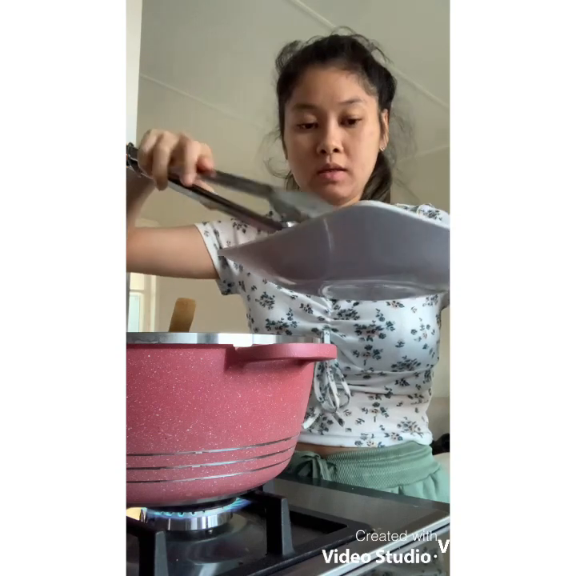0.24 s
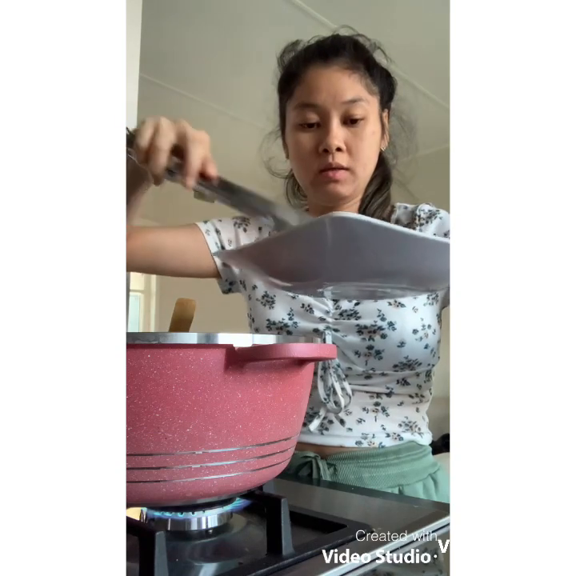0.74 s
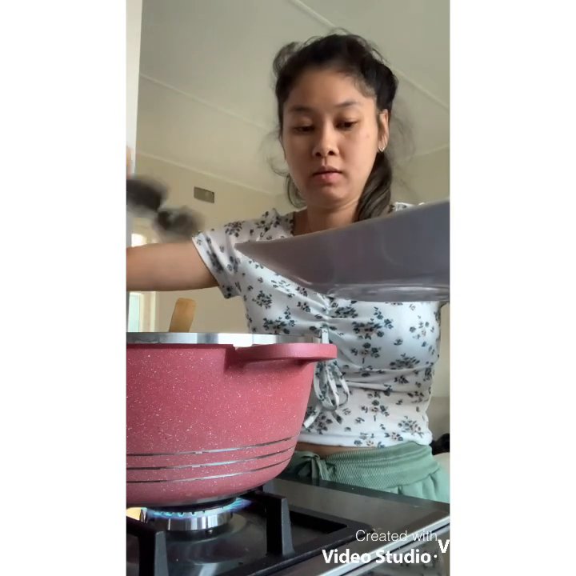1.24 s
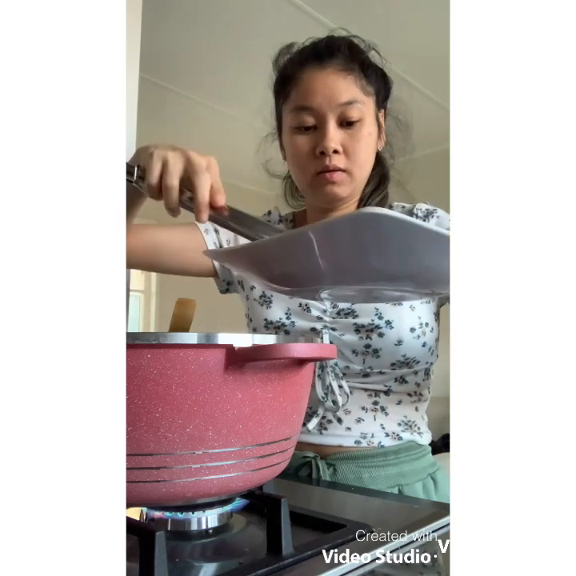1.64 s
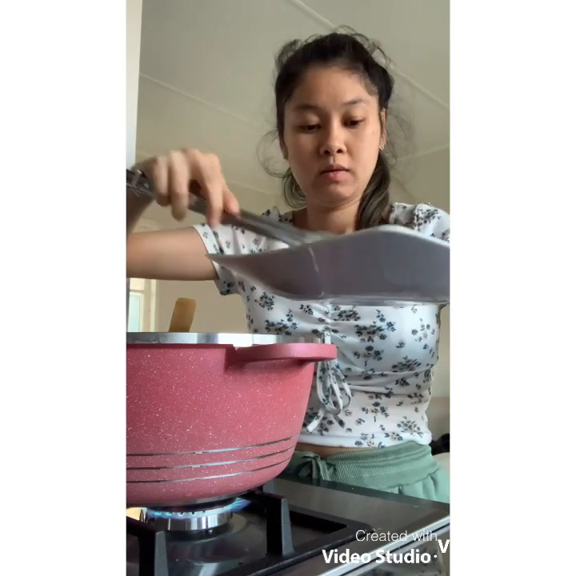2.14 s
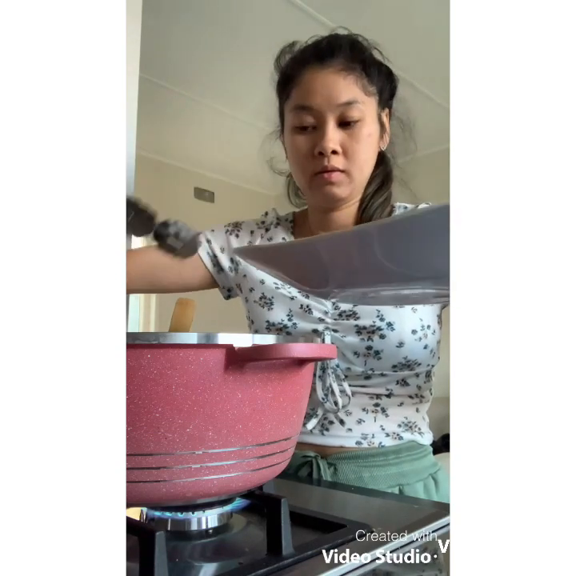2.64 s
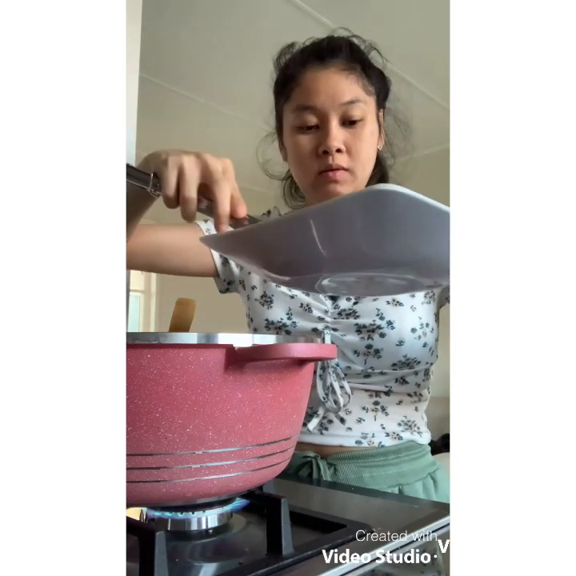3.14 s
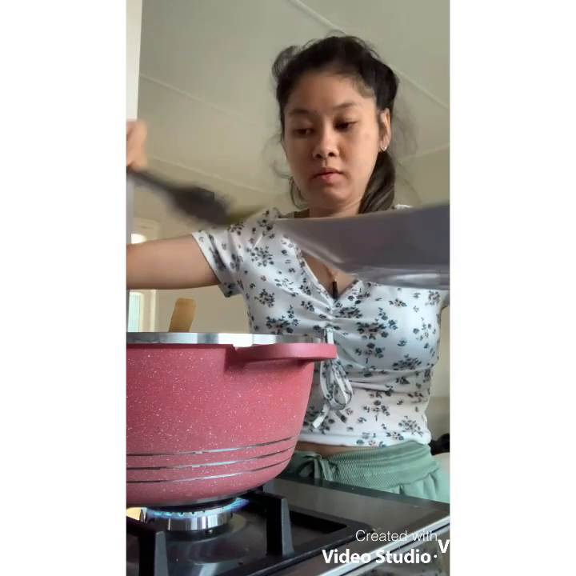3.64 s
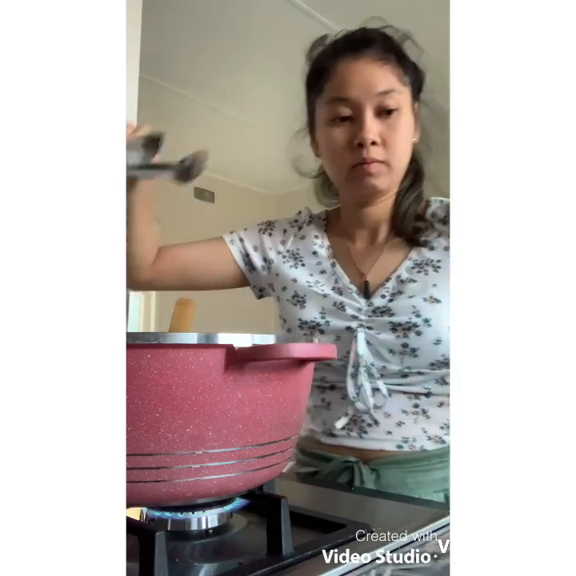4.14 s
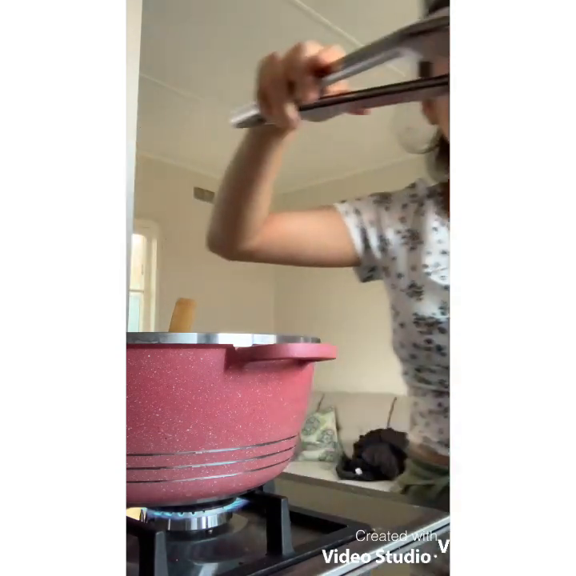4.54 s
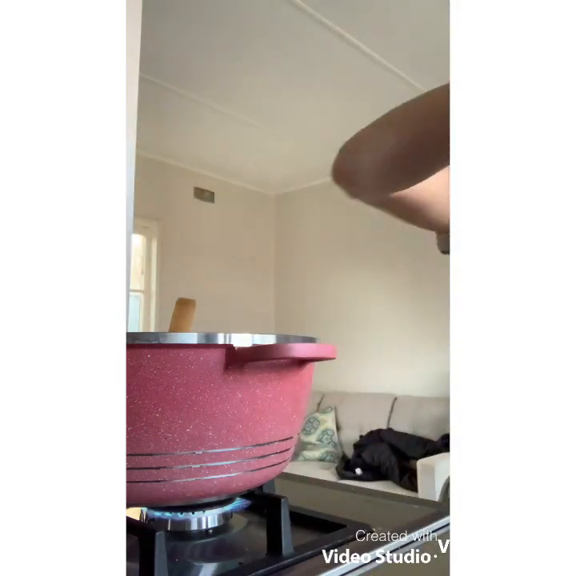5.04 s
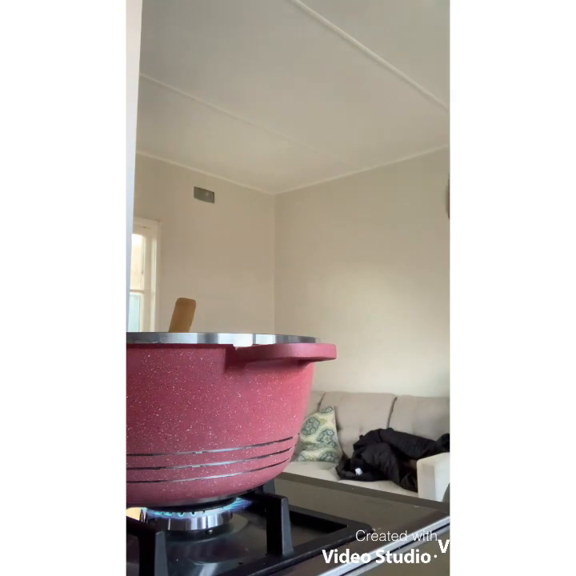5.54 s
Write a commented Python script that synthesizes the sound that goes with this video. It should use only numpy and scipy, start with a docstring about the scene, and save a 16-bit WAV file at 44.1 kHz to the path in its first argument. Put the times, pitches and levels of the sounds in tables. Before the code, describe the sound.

In a small home kitchen, a gas burner rushes softly throughout. Close to a stereo microphone, steel tongs click and their tips tap a plastic tray in loose, irregular bursts with short pauses. Near the end the tongs snap together loudly, rattle several times, and things drag and knock down on the counter.

```python
"""Steel tongs click close to the microphones over the soft, steady rush of a gas burner in a home kitchen.
They pick food off a hand-held plastic tray: the tips tap it, the arms click and slide over each other.
Then the tongs rattle, the arms rub, and things are dragged and put down on the counter with a clatter.
Each blow is a crack of noise shaped by the struck body plus a ring of its modes; slides are grainy hiss.
The flame is fluttering noise; blows and slides also get a short kitchen tail and one distinct reflection."""
import sys
import numpy as np
from scipy import signal
from scipy.fft import rfft, irfft, next_fast_len
from scipy.io import wavfile

SR = 44100
rng = np.random.default_rng(int(sys.argv[2]) if len(sys.argv) > 2 else 0)


def bounce(signal):
    """Save signal as a 16-bit WAV file at the path given by the first command-line argument."""
    frames = np.transpose(np.atleast_2d(signal))
    limited = np.clip(frames, -1, 1)
    pcm = np.round(limited * 32767).astype(np.int16)
    wavfile.write(sys.argv[1], SR, pcm)


N = 255901

# The steel arms click together. Each row: start in seconds, level in dB, t60 of the crack in seconds
# (short when food or the hand damps them), tilt in dB per octave, lift of the low modes in dB.
TONG_CLICKS = [(0.0004, -25, 0.11, 6, 4), (0.17, -25.5, 0.13, 1.5, 8), (0.373, -18, 0.057, 6.5, 10.5),
               (0.9975, -28, 0.04, 2, 1), (1.1607, -24, 0.11, -0.5, -5), (1.2522, -21.5, 0.088, 9.5, 9),
               (1.4002, -39, 0.22, 9, 13), (1.4335, -26, 0.083, -1, -4), (2.253, -26, 0.054, 0.5, 3),
               (2.3624, -30, 0.031, -12.5, -14), (2.835, -13, 0.068, -2, -10),
               (3.0925, -30.5, 0.093, -10.5, -7), (3.5368, -23, 0.044, 1, 3), (3.655, -40.5, 0.039, -2, 0),
               (4.585, -29, 0.032, -2, -17), (4.7131, -2.5, 0.024, 10, 11.5), (4.7456, -9, 0.033, -2.5, 0),
               (4.753, -10.5, 0.025, -6, -11), (4.789, -25.5, 0.039, -1, -5),
               (4.8172, -15, 0.062, 4.5, 3.5), (4.9528, -7.5, 0.075, 3.5, -6), (4.965, -9, 0.087, 0.5, -2),
               (5.0398, -26, 0.04, 13, 0), (5.0694, -23.5, 0.16, -7.5, 2), (5.0947, -4.5, 0.075, 0, -3.5),
               (5.3024, -21.5, 0.055, 10, 25), (5.6831, -4.5, 0.059, -6.5, -7)]
# What the steel rings with. Each row: nominal pitch in Hz, strength in dB, undamped t60 in seconds.
TONG_MODES = [(1600, -11, .18), (2130, -13, .15), (2560, -10, .18), (3100, -6, .14), (3310, -8, .14),
              (3540, -4, .15), (3750, -8, .12), (4355, -3, .15), (4513, -7, .14), (4855, -7, .15),
              (5450, -10, .13), (5990, -4, .15), (6446, -4, .14), (6538, -1, .2), (6995, -2, .2),
              (7500, -1, .18), (7700, -6, .12), (8217, -5, .15), (8480, -3, .17), (9070, -4, .13),
              (9205, -5, .14), (10150, -6, .11), (10416, -4, .12), (10720, -5, .12), (13210, -9, .08)]
# The crowd of short-lived modes in the steel's crack. Each row: frequency in Hz, density in dB per Hz.
TONG_CRACK = [(100, -70), (600, -17), (2100, -15.5), (3000, 3), (4500, 4), (7000, 3), (11000, 2),
              (12800, -12.5), (15000, -3), (16500, -34)]
# What the counter rings with. Each row: nominal pitch in Hz, strength in dB, undamped t60 in seconds.
COUNTER_MODES = [(116, -6, .2), (262, -5, .12), (402, -9, .18), (660, -7, .16), (704, -4, .17),
                 (820, -5, .2), (1000, -5, .16), (1038, -3.5, .16), (1145, -4, .2), (1215, -7, .14),
                 (1418, -1, .18), (1545, -5, .15), (1674, -7, .17), (1870, -11, .16), (1980, -8, .15),
                 (2090, -10, .14), (2322, -12, .14), (2520, -9, .16), (2945, -10, .13), (3015, -6, .14),
                 (3450, -5, .14), (3700, -6, .14), (4026, -5, .12)]
# The short-lived modes in the counter's crack. Each row: frequency in Hz, density in dB per Hz.
COUNTER_CRACK = [(25, -48), (60, -13), (110, -7.5), (180, -32), (270, -6.5), (450, -5), (1000, -10.5),
                 (2000, -5), (3000, 2), (5000, 2.5), (9000, -5), (12000, -19), (16000, -28)]
# The part of a sound in which the two microphones differ. Each row: frequency in Hz, share in dB.
APART = [(80, -26.5), (250, -11), (600, -7.5), (1200, -3), (2500, 2.5), (5000, -24), (12000, -25)]

DAMPING_DB = 28   # ring lost for a tenfold shorter crack
MICROPHONE_SIGNS = np.array([[1], [-1]])   # what differs has opposite sign at left and right


def tray_taps():
    """The tongs' two tips strike the plastic one after the other; damped taps ring less."""
    # Each row: start in seconds, level in dB, tilt in dB per octave, t60 of the crack in seconds,
    # then how strongly the struck spot feeds each of the eight main modes, in dB.
    taps = [(0.1724, -15.5, 0.5, 0.1, 1, 12.5, 1, 8, 3, -13, -3, -9),
            (0.3309, -8.5, 0.5, 0.071, -9, -3, 8, 0.5, 6.5, 1.5, -3, -5),
            (0.3786, -10.5, 0, 0.062, -1, -5, 6, -2, 1, -2.5, -6, -2.5),
            (1.7184, -13, 2.5, 0.05, 10, 12.5, -7, 8.5, -5, 7, -2.5, -4.5),
            (2.835, -10, -4, 0.071, 13, -3.5, -24, 7, 1, 8.5, 9, 9.5),
            (2.9415, -8.5, 1, .062, 9, 4, 7, 14, -6, 0.5, -6, -12),
            (3.119, -18.5, -3.5, .05, 4, 5, -7, 7.5, -12, 4, -3, -6)]
    # The tray's main modes, in Hz.
    main_hz = [630, 840, 970, 1460, 1730, 2280, 2950, 4200]
    # What the tray rings with. Each row: nominal pitch in Hz, strength in dB, undamped t60 in seconds.
    tray_modes = [(385, -8, .14), (613, -14, .1), (700, -10, .11), (843, 0, .12), (952, -1, .13),
                  (1012, -5, .14), (1205, -6, .11), (1420, -2, .12), (1480, -7, .12), (1545, -6, .11),
                  (1684, -8, .1), (1780, -9, .1), (2238, -5, .085), (2325, -6, .085), (2400, -8, .11),
                  (2935, -7, .15), (3045, -9, .1), (3460, -8, .12), (3750, -10, .1), (4060, -8, .09),
                  (4280, -5, .09), (6450, -16, .08), (8300, -16, .08)]
    # The short-lived modes in the tray's crack. Each row: frequency in Hz, density in dB per Hz.
    tray_crack = [(100, -12.5), (300, -7.5), (700, -3.5), (1500, -6), (2500, 1), (4300, 11.5), (6500, -0.5),
                  (10000, -9), (13000, -20), (16000, -39)]
    crack_offset_db, ring_offset_db = -7, -12   # against the tap's level
    free_t60_s = .075   # crack of a tap that no food or hand damps
    tips = ((0, 0), (0.0045, -11))   # delay in seconds, level in dB
    table = []
    for s, db, tilt_db, t60, *fed_db in taps:
        damped_db = DAMPING_DB * np.log10(t60 / free_t60_s)
        for late_s, tip_db in tips:
            crack_db = db + tip_db + crack_offset_db
            ring_db = db + tip_db + ring_offset_db + damped_db
            table.append((s + late_s, crack_db, ring_db, tilt_db, list(zip(main_hz, fed_db)), t60))
    return blows(table, tray_modes, tray_crack, contact_s=0.00068, favour_octaves=0.16, scatter_db=2,
                 hold=.62, sing_db=19, detune=.005, width_hz=50)


def tong_clicks():
    """The steel arms strike each other and ring in their own modes; damped clicks ring less."""
    crack_offset_db, ring_offset_db = -4.5, -9   # against the click's level
    free_t60_s = 0.084   # crack of undamped arms
    body_hz = 2550   # centre of the arms' low modes
    table = []
    for s, db, t60, tilt_db, body_db in TONG_CLICKS:
        damped_db = DAMPING_DB * np.log10(t60 / free_t60_s)
        ring_db = db + ring_offset_db + damped_db
        table.append((s, db + crack_offset_db, ring_db, tilt_db, [(body_hz, body_db)], t60))
    return blows(table, TONG_MODES, TONG_CRACK, contact_s=0.0014, favour_octaves=0.51, scatter_db=3.5,
                 hold=0.5, sing_db=9, detune=.002, width_hz=35)


def counter_knocks():
    """Things put down excite the modes of the struck spot and, to varying degrees, the hollow counter top."""
    # Each row: start in seconds, level in dB, tilt in dB per octave, pitch that the struck spot favours
    # in Hz, lift of the thump in dB, t60 of the crack in seconds.
    knocks = [(5.071, -35.5, -9, 280, 2, .08), (5.091, -32.5, -20, 112, 0, 0.1),
              (5.159, -55, -20, 270, 0, .07), (5.3213, -18.5, 9, 1920, 15, 0.059),
              (5.329, -24.5, -2.5, 826, 9, 0.041), (5.338, -25, 3.5, 1750, 16, 0.11),
              (5.548, -37, -0.5, 2110, 5, .08), (5.634, -18, -3, 1150, -3, .05),
              (5.641, -12.5, -4, 1040, 2.5, 0.065), (5.648, -13.5, 3.5, 724, 10, 0.043),
              (5.665, -15, -1.5, 1350, -0.5, 0.073), (5.696, -25, 1, 1880, -2, 0.13),
              (5.7032, -14.5, -2, 880, -20, 0.055), (5.729, -31, -4, 116, -6, 0.075),
              (5.742, -22.5, -9, 1040, -10, 0.08)]
    # The counter top's hollow notes, in Hz.
    thump_hz = [116, 265]
    spot_lift_db, ring_offset_db = 10, -1.5   # lift of the favoured modes; ring against the knock's level
    table = []
    for s, db, tilt_db, spot_hz, thump_db, t60 in knocks:
        favoured = [(spot_hz, spot_lift_db)] + [(hz, thump_db) for hz in thump_hz]
        table.append((s, db, db + ring_offset_db, tilt_db, favoured, t60))
    return blows(table, COUNTER_MODES, COUNTER_CRACK, contact_s=0.0011, favour_octaves=0.2, scatter_db=3,
                 hold=.8, sing_db=28, detune=.008, width_hz=32)


def blows(table, modes, crack_spectrum, contact_s, favour_octaves, scatter_db, hold, sing_db, detune, width_hz):
    """A blow is a crack of crowded, quickly dying modes and a ring of the few strong ones."""
    # Each row of table: start in seconds, crack and ring in dB, tilt in dB per octave,
    # favoured pairs of Hz and dB, t60 of the crack in seconds.
    snap, snap_s = 0.52, 0.00071   # the first instant stands out: extra amplitude, decay time
    chatter_db, chatter_hz = 2.2, 160   # the surfaces chatter as they part
    mode_apart = 0.46   # share of the difference between the microphones that a single mode shows
    out, t = np.zeros((2, N)), np.arange(SR // 4) / SR
    rest_hz, mode_db, mode_t60 = np.transpose(modes)
    decays = from_db(-60 * t / (hold * mode_t60[:, None]))   # damping leaves the share hold of each t60
    grid_hz = np.geomspace(20, SR / 2, 3000)
    contact = 1 - np.exp(-t / contact_s)   # the force takes a moment to build
    apart = mode_apart * from_db(at_hz(APART, rest_hz)) * MICROPHONE_SIGNS
    for s, crack_db, ring_db, tilt_db, favoured, t60 in table:
        def colour(hz):
            """Each blow has its own brightness, and its spot feeds some modes more than others."""
            lift_db = tilted(hz, tilt_db)
            for spot_hz, db in favoured:
                lift_db = lift_db + db * np.exp(-(np.log2(hz / spot_hz) / favour_octaves) ** 2)
            return lift_db

        # grip and load shift each mode from blow to blow
        mode_hz = rest_hz * (1 + detune * rng.standard_normal(len(modes)))
        rings = np.sin(2 * np.pi * mode_hz[:, None] * t) * decays
        # the crack crowds round the strong modes
        body_db = at_hz(crack_spectrum, grid_hz) + colour(grid_hz) + clusters(grid_hz)
        body_db += resonances(np.c_[mode_hz, mode_db, mode_t60], grid_hz, width_hz, sing_db)
        crack = widen(lambda hz: np.interp(hz, grid_hz, body_db), size=len(t)) * from_db(-60 * t / t60)
        crack *= (1 + snap * np.exp(-t / snap_s)) * from_db(chatter_db * slow_noise(chatter_hz, len(t)))
        # each mode varies in strength and radiates a little differently to each microphone
        strengths = from_db(mode_db + colour(mode_hz) + scatter_db * rng.standard_normal(len(modes)))
        strengths = strengths * (1 + apart * rng.standard_normal(len(modes)))
        strengths = rms_one(strengths) * rng.choice([-1, 1], len(modes)) * np.sqrt(2 / len(modes))
        add(out, s, contact * (from_db(crack_db) * crack + from_db(ring_db) * (strengths @ rings)))
    return out


def tong_slides():
    """The arms slide over each other around every click, and rub while the tongs are carried off."""
    # The longer rubs. Each row: start in seconds, end in seconds, level in dB.
    rubs = [(4.589, 4.746, -47), (4.89, 5.005, -33), (5.031, 5.127, -33.5), (5.102, 5.3, -66),
            (5.304, 5.346, -23)]
    before_s, after_s = 0.073, 0.077   # reach of a slide around its click
    table = [(s - before_s, s + after_s, -56.5, -6) for s, *_ in TONG_CLICKS]   # dB, dB per octave
    table += [(start, end, db, -3) for start, end, db in rubs]
    return scrapes(table, TONG_CRACK, TONG_MODES, grain_db=3, grain_hz=90, catch_height=1.3)


def counter_drags():
    """Things dragged over the counter hiss unevenly and make it sing in its modes."""
    # Each row: start in seconds, end in seconds, level in dB, tilt in dB per octave.
    drags = [(5.13, 5.31, -50.5, 4), (5.41, 5.57, -48, -2.5), (5.535, 5.635, -28.5, -2.5),
             (5.615, 5.69, -21.5, 0)]
    return scrapes(drags, COUNTER_CRACK, COUNTER_MODES, grain_db=3.0, grain_hz=121.5, catch_height=0)


def scrapes(table, spectrum, modes, grain_db, grain_hz, catch_height):
    """A sliding thing catches and slips, so its hiss comes in uneven grains and sings in its modes."""
    out = np.zeros((2, N))
    for start, end, level_db, tilt_db in table:
        size = max(round((end - start) * SR), SR // 100)

        def colour(hz):
            """The surface's spectrum, lifted at its modes."""
            singing = resonances(modes, hz, width_hz=30, height_db=14)
            return at_hz(spectrum, hz) + tilted(hz, tilt_db) + singing + clusters(hz)

        hiss = widen(colour, size=size)
        slips = from_db(grain_db * slow_noise(grain_hz, size))
        slips *= 1 + catch_height * catches(size=size)
        add(out, start, from_db(level_db) * rms_one(hiss * slips) * signal.windows.tukey(size, .5))
    return out


def catches(size):
    """Envelope of tiny contacts that come at random and die at once."""
    catches_per_s, catch_s = 170, .0012   # mean rate, decay time
    struck = rng.random(SR) < catches_per_s / SR
    heights = struck * np.minimum(rng.exponential(1, SR), 3)
    # the tiny offset keeps the filter clear of denormal numbers
    return signal.lfilter([1], [1, -np.exp(-1 / (catch_s * SR))], heights[:size] + 1e-18)


def burner(flutter_db, flutter_hz):
    """The gas flame's steady rush flutters a little in level."""
    # Each row: frequency in Hz, density in dB per Hz.
    flame = [(20, -52), (40, -9), (65, 1), (110, 0), (190, -12), (300, -6), (500, -5.5), (1100, -0.5),
             (1500, -8), (2000, -9), (2400, -19.5), (3600, -16), (5200, -21.5), (6400, -24.5),
             (7300, -23.5), (8200, -26.5), (12000, -42), (16000, -33.5)]
    level_db = -47 + flutter_db * slow_noise(flutter_hz, N)
    return from_db(level_db) * widen(lambda hz: at_hz(flame, hz), size=N)


def kitchen(x, build_s):
    """Dense reflections build up off the near walls and die band by band, the treble first."""
    # Each row: frequency in Hz, t60 in seconds.
    tail_t60 = [(150, 0.5), (800, 0.3), (3000, 0.29), (8000, 0.26), (15000, 0.25)]
    t = np.arange(SR // 2) / SR
    edges = np.geomspace(40, 18000, 10)
    tail = np.zeros((2, len(t)))
    for low, high in zip(edges, edges[1:]):
        band_filter = signal.butter(2, [low, high], "band", fs=SR, output="sos")
        band = signal.sosfilt(band_filter, widen(np.zeros_like, size=len(t)))
        tail += band * from_db(-60 * t / at_hz(tail_t60, np.sqrt(low * high)))
    tail *= 1 - np.exp(-(t / build_s) ** 2)
    tail /= np.sqrt(np.sum(tail ** 2) / 2)
    return signal.fftconvolve(x, tail, axes=1)[:, :N]


def from_the_right(x):
    """Sound bends round the recorder's body: the left microphone lags, frequency by frequency."""
    # Each row: frequency in Hz, phase lag in radians.
    left_lag = [(0, 0), (260, .2), (600, 1.2), (1000, 2.3), (1500, 2.55), (2100, 1.7), (3000, 2.4),
                (4500, 3.15), (9000, 6.3), (22050, 15.7)]
    padded = next_fast_len(N + SR // 10)
    lag = np.interp(np.fft.rfftfreq(padded, 1 / SR), *np.transpose(left_lag))
    left = irfft(rfft(x[0], padded) * np.exp(-1j * lag), padded)[:N]
    return np.array([left, x[1]])


def widen(colour, size):
    """Unit-power stereo noise, least alike at the two microphones in the middle range."""
    apart_colour = lambda hz: colour(hz) + at_hz(APART, hz)
    hz = np.linspace(20, SR / 2, 2000)
    share = np.sqrt(np.sum(from_db(apart_colour(hz)) ** 2) / np.sum(from_db(colour(hz)) ** 2))
    common = noise(colour, size=size)
    return rms_one(common + share * noise(apart_colour, size=size) * MICROPHONE_SIGNS)


def resonances(modes, hz, width_hz, height_db):
    """Lift in dB that a body's modes give to the noise that drives it."""
    mode_hz, mode_db, _ = np.transpose(modes)
    peaks = from_db(mode_db + height_db) ** 2 / (1 + (2 * (hz[:, None] - mode_hz) / width_hz) ** 2)
    return 10 * np.log10(1 + peaks.sum(axis=1))


def clusters(hz):
    """Uneven bunching in dB of the modes that one contact excites; the lowest modes stand alone."""
    depth_db, spacing_hz = 3.2, 70
    knots_hz = np.arange(0, SR / 2, spacing_hz)
    bunching = np.interp(hz, knots_hz, rng.standard_normal(len(knots_hz)))
    return depth_db * bunching * hz / (hz + 250)


def tilted(hz, tilt_db):
    """A slope in dB per octave that leaves the deep bass nearly alone."""
    return tilt_db * np.log2(1 + hz / 250)


def noise(colour, size):
    """Unit-power noise whose dB per Hz is colour(Hz)."""
    padded = next_fast_len(size)
    hz = np.maximum(np.fft.rfftfreq(padded, 1 / SR), 10)
    spectrum = rfft(rng.standard_normal(padded)) * from_db(colour(hz))
    return rms_one(irfft(spectrum, padded)[:size])


def slow_noise(corner_hz, size):
    """Unit-power noise that falls off above corner_hz, for uneven levels."""
    return noise(lambda hz: -20 * np.log10(1 + (hz / corner_hz) ** 2), size=size)


def from_db(db):
    """Decibels to gain."""
    return 10 ** (np.asarray(db) / 20)


def rms_one(x):
    """Scale to unit power."""
    return x / np.sqrt(np.mean(x ** 2) + 1e-20)


def at_hz(points, hz):
    """Read a table on a log-frequency axis."""
    known_hz, values = np.transpose(points)
    return np.interp(np.log(hz), np.log(known_hz), values)


def add(track, s, sound):
    """Mix a sound into a two-channel track from time s on, or from the start if s is negative."""
    start = max(round(s * SR), 0)
    track[:, start:start + sound.shape[-1]] += sound[..., :N - start]


def scene():
    """Tray, tongs and counter sound in the kitchen over the flame."""
    direct = tray_taps() + tong_clicks() + counter_knocks() + tong_slides() + counter_drags()
    room = from_db(-7.5) * kitchen(direct, build_s=0.0003)
    add(room, .025, from_db(-22.5) * direct)   # one distinct reflection off the ceiling
    return from_the_right(direct + room + burner(flutter_db=0.93, flutter_hz=22))


def record(dry):
    """The highest peaks are rounded and the top is cut above 16.3 kHz."""
    top_cut = signal.ellip(10, .1, 80, 16300, fs=SR, output="sos")
    return signal.sosfilt(top_cut, np.tanh(dry))


dry = scene()
out = record(dry)
bounce(out)
```